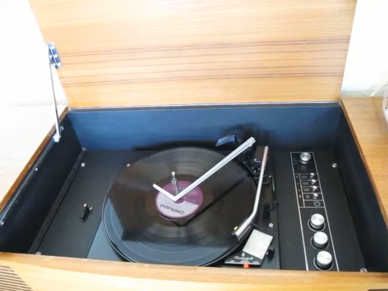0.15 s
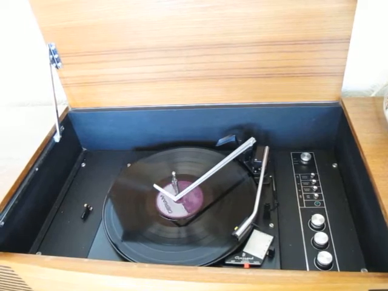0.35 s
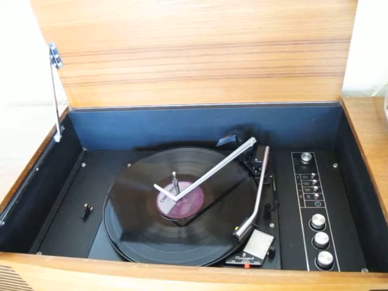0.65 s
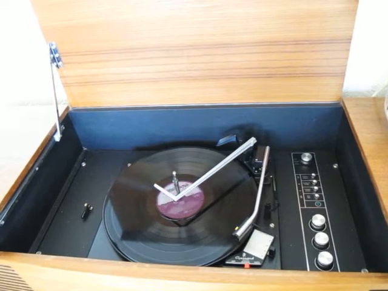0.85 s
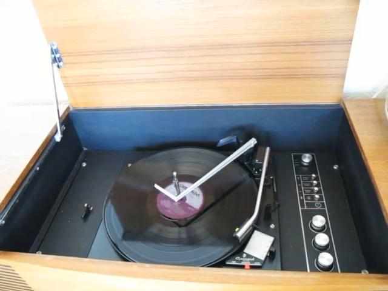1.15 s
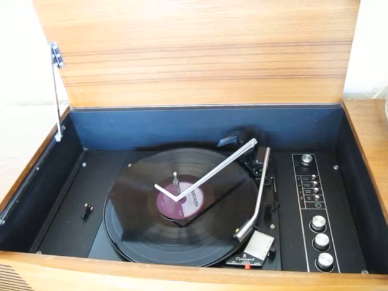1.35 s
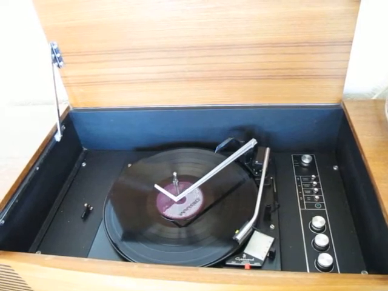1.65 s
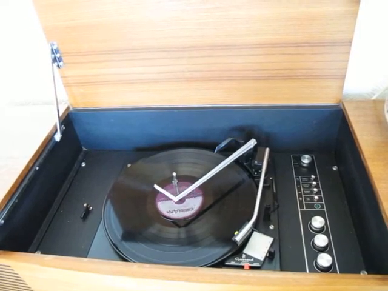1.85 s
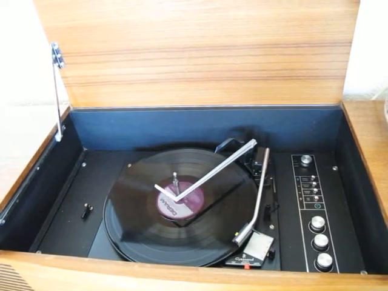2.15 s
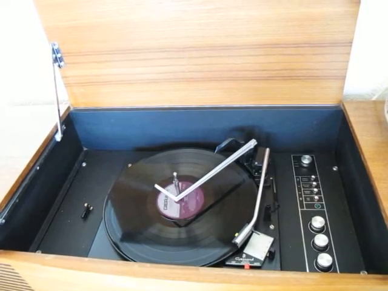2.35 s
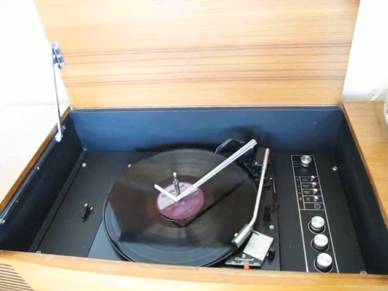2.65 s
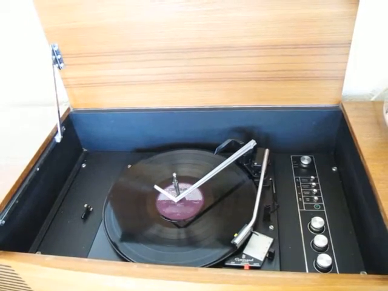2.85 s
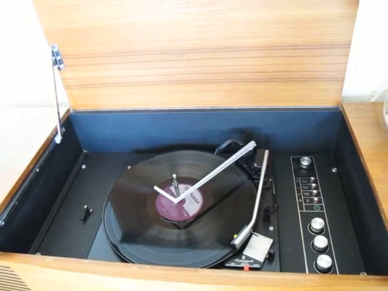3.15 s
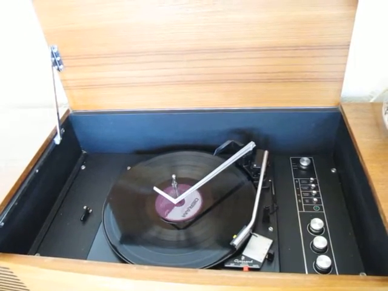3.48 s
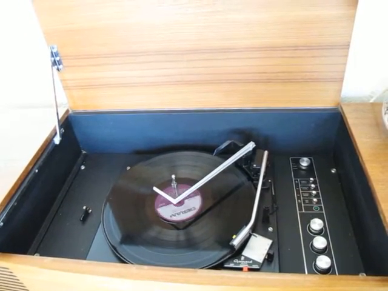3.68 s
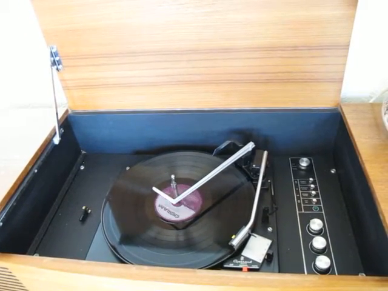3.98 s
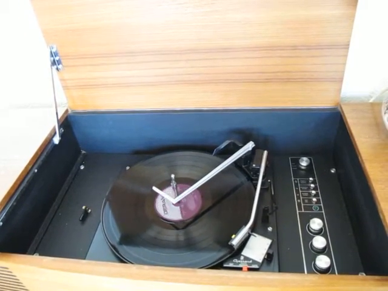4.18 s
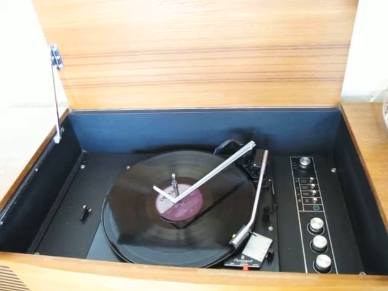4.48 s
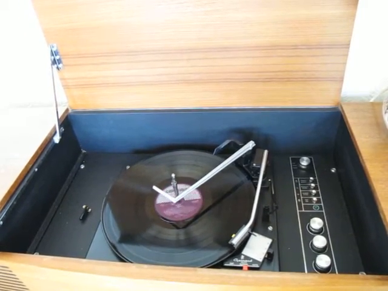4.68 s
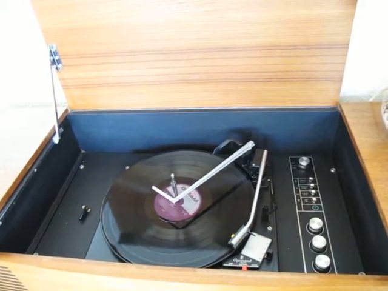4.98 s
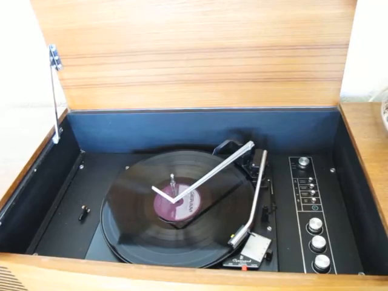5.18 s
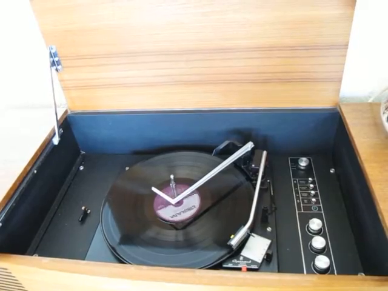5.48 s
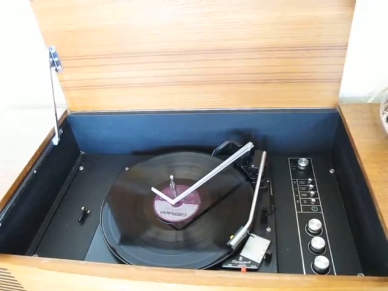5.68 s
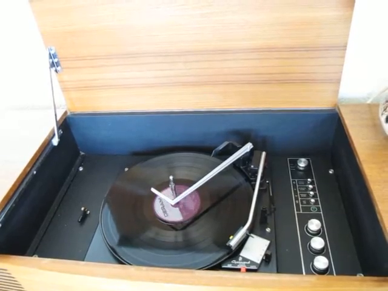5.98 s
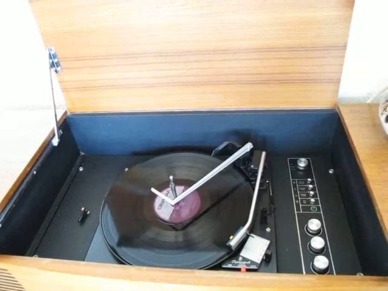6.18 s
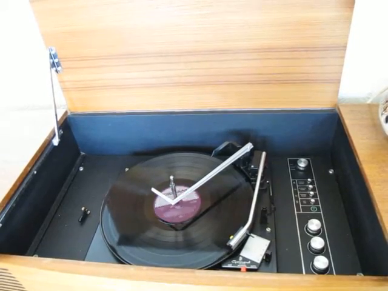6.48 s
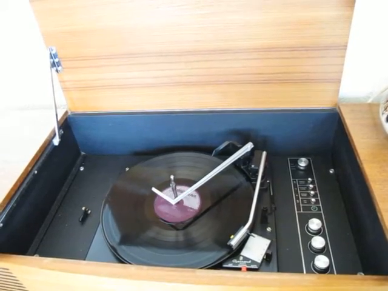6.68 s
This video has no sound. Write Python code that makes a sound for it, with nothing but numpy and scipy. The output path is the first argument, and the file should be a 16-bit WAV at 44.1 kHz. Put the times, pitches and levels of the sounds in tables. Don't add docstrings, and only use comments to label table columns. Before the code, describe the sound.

Low motor hum and hiss, a loud springy metallic snap, then hollow wooden knocks, gear ticking and clattering levers from a turntable mechanism.

```python
import sys
import numpy as np
from scipy import signal
from scipy.fft import rfft, irfft
from scipy.io import wavfile

SR = 44100
rng = np.random.default_rng(int(sys.argv[2]) if len(sys.argv) > 2 else 0)


def wrap_up_sound(samples):
    columns = np.atleast_2d(samples).T
    tamed = np.clip(columns, -1, 1)
    steps = np.round(tamed * 32767).astype(np.int16)
    wavfile.write(sys.argv[1], SR, steps)


def volts_from_decibels(level):
    exponent = np.asarray(level, float) / 20
    return 10 ** exponent


N = 301203

# t/s, gear ticking level/dB, motor hum level/dB
DRIVE = [(0, -65, -38), (.9, -68, -36), (1.5, -68, -37), (1.7, -78, -45), (2.28, -86, -34.5),
         (2.46, -38, -32), (2.651, -57, -41), (3.05, -46.5, -38.5), (3.15, -40, -32.5), (3.4, -65.5, -41),
         (3.8, -53, -37), (4.17, -59.5, -37), (4.321, -34, -28), (4.481, -61, -41.5), (5.301, -64.5, -34),
         (5.85, -58.5, -47.5), (6.118, -58, -34), (6.83, -67.5, -36.5)]
# multiple of mains frequency, rms level/dB
MAINS_HARMONICS = [(2, -70.5), (3, -55.5), (4, -66.5), (5, -68), (6, -83.5), (7, -81)]
# f/Hz, level/dB per Hz
FLOOR_SPECTRUM = [(20, 6.5), (55, -1.5), (75, -13.5), (110, -20), (160, -21.5), (255, -28), (500, -32.5),
                  (1100, -36), (1500, -39.5), (2500, -42.5), (9140, -49.5), (13000, -56), (16000, -58.5)]
# f/Hz, level/dB, t60/s
CABINET_MODES = [(72, 0, .35), (86, 0, .4), (118, -7, .2), (165, -11, .1), (218, 4, .28), (281, -10, .1),
                 (356, 0, .1), (405, -4, .1), (457, -2, .08), (513, -3, .07), (613, 0, .08), (740, -5, .05),
                 (865, -3, .05), (1085, -2, .05), (1170, -4, .04), (1340, -4, .03), (1600, -6, .03)]
# f/Hz, level/dB, t60/s
GEARCASE_MODES = [(385, -23, .04), (608, -30, .04)]
TEETH_DB = [-30, -33.5, -42, -33, -58]
# t/s, level at 300-550 Hz/dB, boom under 150 Hz/dB, thud 150-300 Hz/dB, tap above 700 Hz/dB
BLOWS = [(1.652, -52.5, -11, 2.5, 14.5), (2.336, -32, 4.5, -6, -7.5), (2.408, -25, 11, -3, -2.5),
         (2.463, -31.5, 13, -8, -15), (2.516, -39, 8, -17, 9.5), (2.589, -37, 2, -10, 1.5),
         (2.873, -35.5, -5, -22, -2.5), (3.048, -24, -29, -11, -2), (3.061, -17, -18, -5, -9.5),
         (3.072, -38, -16, 16, 5), (3.104, -30, -5, -8, -15), (4.261, -14, -30, -36, -8),
         (4.271, -15.5, -11, 0, -10), (4.302, -25.5, -12.5, -12, -1), (4.344, -36, 6, -8, 6),
         (4.507, -32, -14, -25, 5), (6.048, -36, 3, -11.5, -3)]
# t/s, level at 300-550 Hz/dB, tap above 700 Hz/dB
NUDGES = [(.125, -62.5, 16.5), (2.655, -42, 2.5), (2.726, -46.5, 6.5), (2.8, -46.5, 4.5), (2.908, -46, 6.5),
          (2.974, -43.5, -10), (3.013, -40.5, -0.5), (3.231, -57.5, 8.5), (3.346, -46, 6.5),
          (3.549, -42.5, -25), (3.622, -52.5, 10), (3.655, -48, 1), (3.766, -45, -2.5), (3.795, -41.5, 3),
          (3.839, -38.5, 2.5), (4.044, -41, -14.5), (4.119, -40, 1), (4.215, -47, 11), (4.528, -43.5, 8),
          (4.608, -56.5, 14), (4.956, -46.5, 9.5), (4.984, -56, 10.5), (5.405, -46.5, -21),
          (5.541, -44.5, 0.5), (5.679, -52, -8), (6.02, -56, -12.5), (6.084, -45, 1), (6.15, -43.5, -15),
          (6.386, -45.5, -22), (6.655, -52, 10.5)]
# t/s, peak level/dB, f/Hz, t60/s
PAWL_TICKS = [(0.195, -57, 1900, .03), (0.238, -48, 1950, 0.033), (0.944, -56, 2910, 0.045),
              (2.74, -54, 3890, 0.037), (2.873, -44, 2600, 0.02), (3.103, -31.5, 1684, 0.041),
              (3.839, -51.5, 3125, .02), (4.12, -52.5, 2740, 0.032), (4.217, -52, 2800, 0.029),
              (4.2588, -21, 2790, 0.026), (4.509, -41.5, 4340, 0.01), (4.956, -49.5, 4470, 0.013),
              (6.083, -58.5, 2195, 0.026)]
# t/s, level/dB, dullness/dB
SCUFFS = [(.245, -70, 16), (.48, -67, -5), (0.945, -71, 11), (2.424, -59.5, 7.5), (2.743, -56.5, 6),
          (2.876, -61, 9.5), (3.111, -59, 16), (3.623, -58.5, 2), (3.841, -68.5, 13.5),
          (4.117, -67.5, 11.5), (4.215, -68, 18.5), (4.509, -62.5, 11), (4.956, -58, 6.5), (6.18, -60.5, 0)]
# t/s, level/dB, below 2.5 kHz/dB, above 7 kHz/dB
TRIP = [
    (1.639, -50.5, 6, 0),
    (1.652, -18, -2, -6.5),
    (1.656, -14, -0.5, 4.5),
    (1.661, -16, -10, -2),
    (1.666, -28, -2.5, -5),
    (1.698, -18.5, -15, 1),
    (1.7233, -18.5, -3.5, -0.5),
    (1.752, -28, 3.5, -27),
    (1.943, -60, 2, -8),
    (4.237, -45, -6, -11),
]
# t/s, level/dB, below 2.5 kHz/dB, above 7 kHz/dB
LATCH = [
    (2.4579, -28.5, -2, 5),
    (2.46, -21.5, 1, -4.5),
    (2.484, -40.5, -13, 8),
]
# t/s, level/dB, rattle/s, below 2.5 kHz/dB, above 7 kHz/dB
DROPS = [
    (3.0485, -21.5, 0.0034, -2.5, -12.5),
    (3.056, -32, 0.0064, 5.5, 5),
    (4.2564, -36.5, 0.0046, 7, 6),
    (4.262, -31.5, 0.0082, -8.5, -12),
    (4.271, -41.5, 0.0047, 13, 9.5),
]
# f/Hz, level/dB per Hz
CRACK_SPECTRUM = [(500, -36.5), (1000, -26.5), (1600, -5.5), (2500, 4), (5000, 4.5), (10500, 9),
                  (12500, 4.5), (14000, -14.5), (15800, -13.5), (16600, -39)]
# f/Hz, level/dB, t60/s
STEEL_MODES = [(2130, -30, .015), (2880, -28, .04), (3550, -30, .015), (6110, -27, .012)]
# f/Hz, level/dB, t60/s
STUB_MODES = [(7800, -22, .008), (8250, -26, .015), (9550, -19, .015), (9850, -20, .03), (11900, -19, .008)]
# f/Hz, level/dB, t60/s
SPRING_MODES = [(4570, -4, .02), (4680, -1, .03), (4813, -8, .08), (4890, -6, .025)]
# f/Hz, t60/s
ROOM_DECAY = [(150, 0.34), (600, 0.4), (2000, 0.38), (6000, 0.3), (11000, 0.3), (15000, 0.05)]

MAINS_HZ, RUMBLE_DB, FLOOR_DB = 49.96, 0, -48.5
GEARS_MESH_S = 2.33
IDLER_DB, IDLER_STOPS_S = -66, 1.652
BLOW_BOARD_DB = -4.5
NUDGE_BOOM_DB, NUDGE_THUD_DB, NUDGE_BOARD_DB = 0, -5.5, 2
TRIP_RATTLE_S, TRIP_SPRING_DB = 0.0022, -1
LATCH_RATTLE_S, LATCH_SPRING_DB = 0.0024, -16
SCUFF_RATTLE_S, SCUFF_SPRING_DB = .005, -22
DROP_SPRING_DB = -25
TOP_DB, TOP_FOLLOWS_SPRING = 7, 0.17
ROOM_DB, TICK_ROOM_SHARE = -6, .4
DUCK_OVER_DB, DUCK_SHARE, RECOVER_DB_S, ATTACK_S = -16, .7, 14.5, .025


def rms_one(x):
    return x / np.sqrt(np.mean(x ** 2) + 1e-20)


def at_hz(points, hz):
    p = np.array(points)
    return np.interp(np.log(np.maximum(hz, 1)), np.log(p[:, 0]), p[:, 1])


def coloured(x, spectrum):
    size = 8192
    cepstrum = irfft(np.log(volts_from_decibels(at_hz(spectrum, np.fft.rfftfreq(size, 1 / SR)))))
    cepstrum[1:size // 2] *= 2
    cepstrum[size // 2 + 1:] = 0
    impulse = irfft(np.exp(rfft(cepstrum)))
    return signal.fftconvolve(x, impulse)[:N]


def band(x, low_hz, high_hz):
    return signal.sosfilt(signal.butter(2, [low_hz, high_hz], "band", fs=SR, output="sos"), x)


def ring(force, hz, t60):
    r = volts_from_decibels(-60 / (max(t60, .005) * SR))
    w = 2 * np.pi * hz / SR
    return signal.lfilter([0, np.sin(w)], [1, -2 * r * np.cos(w), r * r], force + 1e-18)


def contacts(events, levels_db, grains):
    out, t = np.zeros(N), np.arange(2000) / SR
    for (s, rattle_s), db in zip(events, levels_db):
        i = round(s * SR)
        shape = (1 - np.exp(-t / .0006)) * np.exp(-t / max(rattle_s, .002))
        out[i:i + 2000] += volts_from_decibels(db) * shape * grains[i:i + 2000]
    return out


def hum_and_floor(motor_db):
    t = np.arange(N) / SR
    hum = sum(volts_from_decibels(db) * np.sqrt(2) * np.sin(2 * np.pi * (k * MAINS_HZ * t + rng.random()))
              for k, db in MAINS_HARMONICS)
    rumble = rms_one(band(rng.standard_normal(N), 36, 58))
    motor = np.sqrt(2) * np.sin(2 * np.pi * MAINS_HZ * t) + volts_from_decibels(RUMBLE_DB) * rumble
    motor *= volts_from_decibels(motor_db - 7)
    hiss = coloured(rng.standard_normal(N), FLOOR_SPECTRUM)
    hiss = signal.sosfilt(signal.butter(2, 60, "high", fs=SR, output="sos"), hiss)
    deep = rms_one(band(rng.standard_normal(N), 24, 44)) * volts_from_decibels(-51)
    return hum + motor + deep + volts_from_decibels(FLOOR_DB) * rms_one(hiss)


def gear_teeth(gear_db):
    struck = rng.random(N) < 150 / SR
    hardness = volts_from_decibels(3.7 * np.minimum(rng.exponential(1, N), 4))
    return rms_one(struck * hardness * rng.choice([-1, 1], N)) * volts_from_decibels(gear_db)


def knocks():
    rows = [(s, db, boom, thud, BLOW_BOARD_DB, tap) for s, db, boom, thud, tap in BLOWS]
    return rows + [(s, db, NUDGE_BOOM_DB, NUDGE_THUD_DB, NUDGE_BOARD_DB, tap) for s, db, tap in NUDGES]


def cabinet(gear_db):
    s, db, boom_db, thud_db, board_db, tap_db = np.transpose(knocks())
    at = np.round(s * SR).astype(int)
    teeth = gear_teeth(gear_db)
    meshed = np.arange(N) > GEARS_MESH_S * SR
    scatter_db = 2 * rng.standard_normal((len(s), len(CABINET_MODES)))
    side = rng.choice([-1, 1], len(s))
    out = sum(volts_from_decibels(mode_db) * ring(teeth * meshed, hz, t60) for hz, mode_db, t60 in GEARCASE_MODES)
    for k, (hz, mode_db, t60) in enumerate(CABINET_MODES):
        part = np.searchsorted([150, 300, 550, 700], hz)
        part_db = [boom_db, thud_db, 0, board_db, tap_db][part]
        force = teeth * volts_from_decibels(TEETH_DB[part]) * meshed
        force[at] += side * volts_from_decibels(db + part_db + scatter_db[:, k])
        swell = np.exp(-hz / (.35 * SR))
        force = signal.lfilter([1 - swell], [1, -swell], force)
        out += (-1) ** k * volts_from_decibels(mode_db) * ring(force, hz, t60)
    rattle = contacts(np.c_[s, s * 0 + .012], db + tap_db - 1.0, rng.standard_normal(N))
    out += band(rattle, 500, 1570) + volts_from_decibels(8.5) * band(teeth, 300, 865)
    idling = np.arange(N) < IDLER_STOPS_S * SR
    out += volts_from_decibels(IDLER_DB) * idling * rms_one(band(rng.standard_normal(N), 800, 1350))
    return signal.sosfilt(signal.butter(2, 2600, fs=SR, output="sos"), out)


def pawls():
    out, t = np.zeros(N), np.arange(4000) / SR
    for s, db, hz, t60 in PAWL_TICKS:
        i = round(s * SR)
        envelope = volts_from_decibels(db - 60 * t / t60) * (1 - np.exp(-t / 0.000082))
        out[i:i + 4000] += envelope * np.sin(2 * np.pi * hz * t)
    return out


def snaps():
    rows = [(s, db, TRIP_RATTLE_S, low, high, TRIP_SPRING_DB) for s, db, low, high in TRIP]
    rows += [(s, db, LATCH_RATTLE_S, low, high, LATCH_SPRING_DB) for s, db, low, high in LATCH]
    rows += [(*row, DROP_SPRING_DB) for row in DROPS]
    return rows + [(s, db, SCUFF_RATTLE_S, dull, -dull - 3, SCUFF_SPRING_DB) for s, db, dull in SCUFFS]


def levers():
    s, db, rattle_s, low_db, high_db, spring_db = np.transpose(snaps())
    when = np.c_[s, rattle_s]
    grains = rng.standard_normal((3, N))
    top_db = db + high_db + TOP_DB + TOP_FOLLOWS_SPRING * spring_db
    crack = band(contacts(when, db + low_db + 12, grains[0]), 800, 2500)
    crack += band(contacts(when, db + 7, grains[0]), 2500, 7000)
    crack += band(contacts(when, db + high_db + 5, grains[0]), 7000, 12000)
    crack += band(contacts(when, top_db, grains[0]), 12000, 19000)

    pluck = [contacts(when, db + spring_db, g) for g in grains[1:]]
    bright = contacts(when, db + high_db + 0.056 * spring_db - 6.0, grains[1])
    parts = np.zeros(N)
    for k, (hz, mode_db, t60) in enumerate(STEEL_MODES):
        parts += volts_from_decibels(mode_db + 6.0) * ring(pluck[k % 2], hz, t60)
    for hz, mode_db, t60 in STUB_MODES:
        parts += volts_from_decibels(mode_db) * ring(bright, hz, t60)
    for k, (hz, mode_db, t60) in enumerate(SPRING_MODES):
        parts += volts_from_decibels(mode_db - 12.0) * ring(pluck[k % 2], hz, t60)
    parts = signal.sosfilt(signal.butter(1, 1200, "high", fs=SR, output="sos"), parts)
    return volts_from_decibels(3.5) * coloured(crack, CRACK_SPECTRUM) + parts


def room(x):
    t = np.arange(SR // 2) / SR
    tail = np.zeros(len(t))
    for hz in 125 * 2.0 ** np.arange(0, 7.1, .5):
        noise = band(rng.standard_normal(len(t)), hz / 1.25, hz * 1.25)
        tail += noise * volts_from_decibels(-60 * t / at_hz(ROOM_DECAY, hz))
    tail *= np.clip((t - .003) / 0.0013, 0, 1)
    return volts_from_decibels(ROOM_DB) * signal.fftconvolve(x, tail / np.sqrt(np.sum(tail ** 2)))[:N]


def scene():
    s, gear_db, motor_db = np.transpose(DRIVE)
    t = np.arange(N) / SR
    deck = levers() + cabinet(np.interp(t, s, gear_db))
    ticks = pawls()
    reverb = room(deck + TICK_ROOM_SHARE * ticks)
    background = hum_and_floor(np.interp(t, s, motor_db))
    return (deck + ticks + reverb + background)[None]


def top_cut(x):
    return signal.sosfilt(signal.butter(12, 16510, fs=SR, output="sos"), x)


def record(dry):
    peak_db = 20 * np.log10(np.abs(dry[0]) + 1e-9)
    over = np.maximum(peak_db - DUCK_OVER_DB, 0) * DUCK_SHARE
    ramp = RECOVER_DB_S * np.arange(N) / SR
    duck_db = np.maximum.accumulate(over + ramp) - ramp
    r = np.exp(-1 / (ATTACK_S * SR))
    mix = dry * volts_from_decibels(-signal.lfilter([1 - r], [1, -r], duck_db))
    mix = signal.sosfilt(signal.cheby2(8, 40, 16600, fs=SR, output="sos"), mix)
    return top_cut(mix)


dry = scene()
out = record(dry)
wrap_up_sound(out)
```